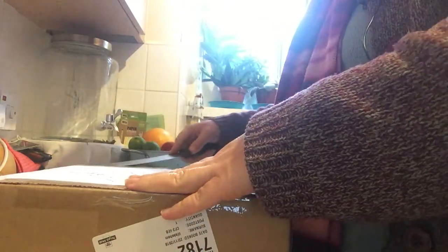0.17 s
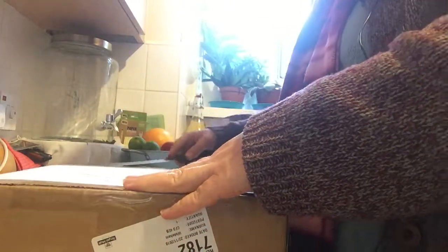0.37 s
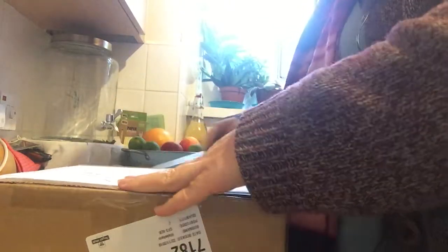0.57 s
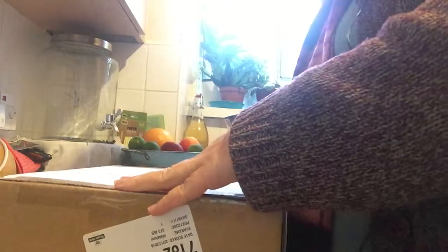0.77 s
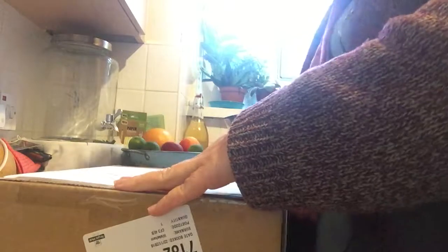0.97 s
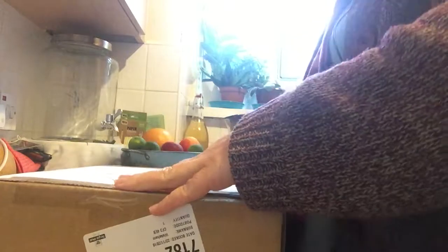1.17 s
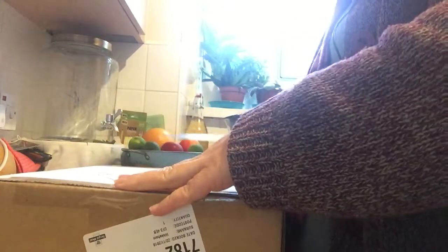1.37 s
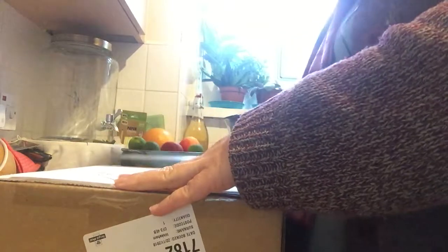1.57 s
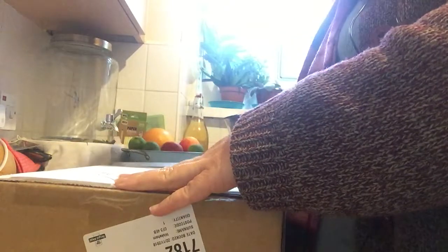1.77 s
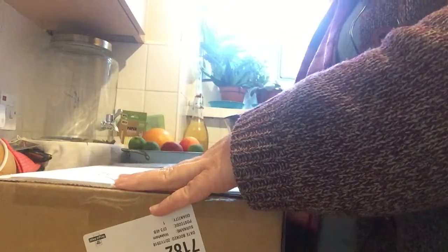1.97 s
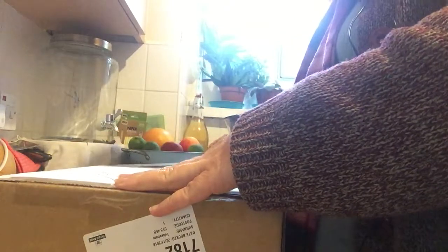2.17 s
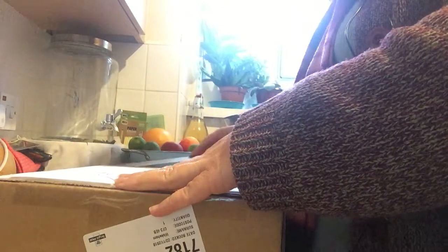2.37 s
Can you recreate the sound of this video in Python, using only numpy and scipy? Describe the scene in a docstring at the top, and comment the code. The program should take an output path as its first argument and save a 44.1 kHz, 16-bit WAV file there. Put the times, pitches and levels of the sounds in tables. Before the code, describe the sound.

A knife cuts packing tape on a cardboard box, close by in a small kitchen. It jabs in with a hollow knock at 0.1 seconds, then drags and catches from 0.4 to 0.6. From 0.8 to 1.1 it slits through with a rising zip and a thud. Quieter tape snaps and taps follow, with a knock at 1.9 and a light scrape from 2.2, over a low handling rumble.

```python
"""Knife opening a taped parcel

A knife works through the packing tape of a cardboard box, close by in a small kitchen. The blade
sticks and slips: each slip shakes the box and tears the tape in tiny clicks. After a jab and a long
pull, one stroke slits through with a rising zip and a thud. Then come tape snaps, knocks of the tip
and a light scrape, over a deep handling rumble and a faint hum."""
import sys
import numpy as np
from scipy import signal
from scipy.fft import rfft, irfft
from scipy.io import wavfile
from scipy.ndimage import uniform_filter1d

SR = 44100
rng = np.random.default_rng(int(sys.argv[2]) if len(sys.argv) > 2 else 0)


def store_pcm(level_fs):
    """Save levels as 16-bit WAV."""
    pcm = np.round(np.clip(level_fs, -1, 1) * 32767).astype(np.int16)
    wavfile.write(sys.argv[1], SR, np.atleast_2d(pcm).T)


N = 106236

# The tone of tearing tape. Each row: frequency in Hz, level in dB.
TAPE_TONE = [(900, -25.5), (1800, 2), (2800, 1), (3600, 2), (5500, 4.5), (8500, 2), (11000, 1.5),
             (13500, -3.5), (16000, -7.5)]
TEARS_PER_S, TEAR_SCATTER_DB = 5500, 0.5
PULL_TILT = -1.9  # a tilt is in dB per octave: higher is brighter


def stroke(levels, board_tone, tilt, blade_db=-24.5, fade_db_per_s=411):
    """The blade sticks and slips: it shakes the box, crushes fibres, tears tape and rings a little."""
    t = seconds()
    times, board_db, tape_db = np.array(levels).T
    outside_s = np.maximum(times[0] - t, 0) + np.maximum(t - times[-1], 0)
    grip = unit(undb(1.5 * wander(300))) * undb(-fade_db_per_s * outside_s)
    slips = unit(random_clicks(per_s=1300, scatter_db=2.5))
    force = grip * undb(np.interp(t, times, board_db) - 5)
    board = through(slips * force, energy_one(colour(box_ring(), board_tone)))
    crush = through(flutter(slips) * force, energy_one(colour(click(0), board_tone)))
    tears = unit(random_clicks(TEARS_PER_S, TEAR_SCATTER_DB)) + 0.064 * slips
    tears = unit(tears + undb(-2.5) * flutter(tears))
    # The steel blade's notes. Each row: frequency in Hz, level in dB, seconds to fade by 60 dB.
    blade_notes = [(1936, 9.5, 0.26), (2136, 7, 0.17), (2830, -2, 0.088), (3800, -1, 0.24),
                   (5850, -13, 0.12), (6660, -7, 0.13)]
    tape_and_blade = energy_one(colour(click(0), TAPE_TONE, tilt)) + undb(blade_db) * ring(blade_notes)
    rasp = through(tears * grip * undb(np.interp(t, times, tape_db) - 2.4), tape_and_blade)
    return board + undb(2.5) * crush + rasp


def box_ring(dense_db=1):
    """A tapped box rings with its panels' notes and the dense, quickly dying noise of corrugated card."""
    # Each row: frequency in Hz, level in dB, seconds to fade by 60 dB.
    panel_notes = [(133, 0, .09), (217, 0.5, .095), (255, -5, .06), (323, -3, .055), (365, -4, .07),
                   (492, 1, .05), (570, 1, .055), (680, -3, .045), (758, -4, .07), (894, -9, .07),
                   (1206, -2, .038), (1712, -19, .05), (2266, -18, .04)]
    return ring(panel_notes, spread=.006) + undb(dense_db) * tail(.03)


def cuts():
    """A jab, a long pull and a slit, with the blade buried in the tape so that it barely rings."""
    # Each row: time in seconds, relative cardboard level in dB, relative tape level in dB.
    jab = [(0, -32.5, -57), (.032, -66, -69), (.07, -48, -53), (.09, -41, -55.5), (.111, -36.5, -51.5),
           (.116, -23, -39), (.127, -25.5, -28), (.138, -68, -51), (.146, -29.5, -40), (.166, -32.5, -40),
           (.21, -61, -66), (.236, -37.5, -56), (.26, -53, -50.5), (.34, -47, -50.5), (.385, -57, -66)]
    pull = [(0.385, -51, -61), (0.411, -36.5, -44), (0.503, -31.5, -37.5), (0.563, -40, -45),
            (0.575, -34.5, -33), (0.605, -48.5, -52.5), (0.631, -49, -50.5), (0.743, -48.5, -49.5),
            (0.75, -45, -57)]
    slit = [(0.75, -53, -50.5), (0.778, -43, -51.5), (0.79, -30, -44), (0.802, -34, -34),
            (0.812, -36.5, -50.5), (0.83, -41.5, -44.5), (0.87, -30.5, -47), (0.884, -38.5, -50.5),
            (0.914, -31.5, -35), (0.946, -30.5, -33), (0.984, -33, -34), (1.014, -41, -47),
            (1.036, -44, -51.5), (1.098, -42, -50), (1.17, -45, -47), (1.265, -53.5, -62.5)]
    # The cardboard's tone under each stroke. Each row: frequency in Hz, level in dB.
    jab_tone = [(60, -57), (125, 0.5), (230, -4), (300, 0.5), (470, 1.5), (600, 0), (880, -4.5),
                (1050, -10.5), (1400, -16.5), (2500, -17), (4000, -29)]
    pull_tone = [(60, -29.5), (125, -1.5), (350, 4.5), (520, -3), (800, 1.5), (1050, -5), (1500, -12.5),
                 (2200, -9.5), (4000, -35)]
    slit_tone = [(60, -13.5), (135, 3), (230, 0.5), (480, 0), (750, -0.5), (1100, -5.5), (1600, -10),
                 (2400, -16), (4000, -56)]
    return (stroke(jab, jab_tone, tilt=-1.4)
            + stroke(pull, pull_tone, tilt=PULL_TILT)
            + stroke(slit, slit_tone, tilt=-0.76))


def light_scrape():
    """The blade skims the tape, then eases off and settles, ringing more freely than in a cut."""
    # Each row: time in seconds, relative cardboard level in dB, relative tape level in dB.
    skim = [(2.165, -55, -57), (2.253, -48.5, -49.5), (2.29, -55.5, -56)]
    settle = [(2.305, -57, -61), (2.34, -44.5, -55.5), (2.385, -67, -56), (2.409, -40.5, -55)]
    # The cardboard's tone. Each row: frequency in Hz, level in dB.
    tone = [(60, -9), (130, 3.5), (205, 6), (330, -0.5), (520, 0), (780, -1), (1100, -8.5), (2000, -11.5),
            (4000, -31)]
    return (stroke(skim, tone, tilt=0.9, blade_db=-8, fade_db_per_s=116)
            + stroke(settle, tone, tilt=-9, blade_db=-8))


def catches(start_s=.405, end_s=.58, per_s=95):
    """The blade keeps catching in the long pull; each release nicks the tape and rings lid and blade."""
    # Each row: frequency in Hz, level in dB, seconds to fade by 60 dB.
    notes = [(735, 1, 0.088), (895, -0.5, 0.051), (1120, -2, 0.019), (1680, -20, 0.027), (1955, -9, 0.049),
             (2420, -7, 0.013)]
    gaps, sizes = rng.standard_normal((64, 2)).T
    times = start_s + np.cumsum(np.exp(.25 * gaps)) / per_s
    releases = sum(undb(-11.5 + 2 * size) * click(at) for at, size in zip(times, sizes) if at < end_s)
    tick = energy_one(colour(tail(0.0048), TAPE_TONE, PULL_TILT))
    return through(releases, ring(notes, spread=.006) + undb(-11) * tick)


def slit_through(zip_s=.943, width_s=.02, zip_db=-36.5, band_hz=2200, thud_s=.9545):
    """The tape parts with a zip that climbs as the blade speeds up, and the lid gives way with a thud."""
    # Each row: time in seconds, pitch of the zip in Hz.
    zip_pitch = [(.912, 3400), (.926, 3957), (.936, 5250), (.955, 5750), (.98, 5500)]
    t = seconds()
    hz = np.interp(t, *np.array(zip_pitch).T)
    overtone = swell(zip_s + .018, width_s, zip_db - 4.5) * narrow_noise(2 * hz, 2 * band_hz)
    main_note = swell(zip_s, width_s, zip_db) * narrow_noise(hz, band_hz)
    roughness = unit(undb(2.5 * wander(460)))
    push = np.exp(-2 * np.pi * 400 * t) - np.exp(-t / 0.066)  # builds fast, lets go slowly
    return (main_note + overtone) * roughness + undb(-21) * through(click(thud_s), push)


def knocks(boost_db=12):
    """The knife tip knocks on the hollow box and rings its panels."""
    # Each row: start in seconds, level in dB before the boost, tilt in dB per octave.
    hits = [(0.1218, -9, 2.5), (.131, -11, -1), (.234, -46, 3), (0.5701, -15, 2), (0.791, -28, -2),
            (0.947, -23, 12), (1.2913, -41.5, -1.5), (1.8972, -22, 2), (1.9015, -41, 4.5),
            (1.978, -36.5, 3), (2.3233, -21, 1)]
    # Each row: frequency in Hz, level in dB.
    tone = [(50, -28.5), (120, -1.5), (330, -1), (490, 3.5), (750, -3.5), (1000, -7), (1220, -2),
            (1450, -10.5), (2500, -16), (7000, -42), (16000, -46)]
    panels = box_ring(dense_db=-9)
    return sum(undb(db + boost_db) * delayed(energy_one(colour(panels, tone, tilt)), at)
               for at, db, tilt in hits)


def bumps(boost_db=11):
    """The parcel shifts on the worktop, and dull bumps ring the low notes of its panels."""
    # Each row: start in seconds, level in dB before the boost.
    hits = [(.7745, -19), (.9135, -17), (.9555, -16), (1.005, -20), (1.2915, -28), (1.668, -39),
            (1.982, -33)]
    # Each row: frequency in Hz, level in dB.
    tone = [(40, 16.5), (120, 1.5), (300, 9), (700, -5.5), (1300, -5), (3000, -17), (16000, -46)]
    pushes = sum(undb(db + boost_db) * click(at) for at, db in hits)
    return through(pushes, energy_one(colour(box_ring(), tone)))


def snaps():
    """Tight tape lets go with a sharp tick and a short noisy tail."""
    # Each row: start in seconds, relative level in dB, tilt in dB per octave.
    releases = [(0.1134, -22.5, 1), (0.5763, -18.5, 10), (0.7888, -23, 4), (.793, -26, 14), (.8253, -33, 1),
                (1.2778, -29.5, -3.5), (1.4791, -31.5, -4), (1.825, -48, 1), (2.087, -33.5, 11.5),
                (2.126, -32, 5.5), (2.1564, -31.5, 9), (2.3233, -21, -6.5)]
    # Each row: frequency in Hz, level in dB.
    tone = [(300, -39), (2000, -19), (3500, -5), (5800, 3.5), (8500, -7.5), (12000, -5), (16000, -18.5)]
    crack = click(0) + 1.2 * tail(0.009) + undb(-2.5) * tail(0.11)
    return sum(undb(db) * delayed(2 * energy_one(colour(crack, tone, tilt)), at)
               for at, db, tilt in releases)


def scratches(fall_s=0.0085):
    """The tip snags and tears the tape in brief bursts."""
    # Each row: peak time in seconds, rise in seconds, relative level in dB, tilt in dB per octave.
    bursts = [(0.122, 0.0028, -32.5, 2), (0.144, 0.0014, -33.5, -4), (.801, 0.0034, -37.5, 17),
              (1.8915, 0.0039, -50, 4), (1.902, 0.0086, -51, -5), (1.975, 0.0025, -46, 0.5),
              (2.3196, 0.0035, -39, -3)]
    t = seconds()
    tears = random_clicks(TEARS_PER_S, TEAR_SCATTER_DB)
    tears = unit(tears) + flutter(tears)
    sound = np.zeros(N)
    for at, rise_s, db, tilt in bursts:
        loudness = undb(db) * np.exp(np.minimum((t - at) / rise_s, (at - t) / fall_s))
        sound += loudness * unit(colour(tears, TAPE_TONE, tilt))
    return sound


def slides():
    """The flat of the blade rubs along the tape's edge, and the friction makes rough notes."""
    # Each row: peak time in seconds, width in seconds, level in dB, pitch in Hz, pitch spread in Hz.
    rubs = [(1.18, 0.064, -57.5, 1895, 330), (1.35, 0.11, -72, 1945, 100), (2.2, 0.058, -56, 757.6, 220),
            (2.22, 0.045, -64, 2810, 260), (2.23, 0.029, -59.5, 6100, 950),
            (2.308, 0.024, -53.5, 1958, 100)]
    return sum(swell(at, width_s, db) * narrow_noise(hz, band_hz) for at, width_s, db, hz, band_hz in rubs)


def brushes():
    """The hand that steadies the box brushes softly over the lid."""
    # Each row: peak time in seconds, width in seconds, level in dB.
    touches = [(1.384, 0.076, -61), (1.672, 0.005, -67)]
    # Each row: frequency in Hz, level in dB.
    tone = [(80, -16), (300, 0), (700, 1.5), (1200, -12), (2400, -17.5), (16000, -46)]
    return sum(swell(*touch) for touch in touches) * unit(colour(rng.standard_normal(N), tone))


def rumble():
    """Handling makes a very deep rumble that eases once the cut is done."""
    # Each row: time in seconds, level in dB.
    levels = [(0, -29.5), (.5, -27), (1.05, -26.5), (1.3, -36.5), (1.6, -35), (1.8, -57), (2.1, -45),
              (2.409, -52)]
    sway = filtered(rng.standard_normal(2 * N), [2.732, 4.236], "band")[N:]  # skip the slow build-up
    upper = filtered(rng.standard_normal(N), 27.2, "low")
    loudness = undb(np.interp(seconds(), *np.array(levels).T))
    return (unit(sway) + undb(-19.5) * unit(upper)) * loudness


def kitchen(split_hz=2000):
    """The direct sound, then a short echo off the tiles in which the treble dies a little sooner."""
    low = filtered(tail(0.32), split_hz, "low")
    high = filtered(tail(0.3), split_hz, "high")
    return click(0) + undb(-12) * through(low + 0.85 * high, click(.005))


def background(hum_hz=323):
    """Faint room noise and the hum of an appliance, both wavering slightly."""
    # Each row: frequency in Hz, level in dB.
    air_tone = [(20, 7), (45, -1), (90, -11.5), (200, -15.5), (500, -24.5), (1000, -32.5), (2500, -43),
                (8000, -44.5), (16000, -49)]
    air = unit(colour(rng.standard_normal(N), air_tone)) * undb(wander(6.1))
    hum = unit(np.sin(2 * np.pi * hum_hz * seconds()) * undb(2 * wander(11.3)))
    return undb(-52) * air + undb(-67) * hum


def undb(db):
    """Turn decibels into a multiplier."""
    return 10 ** (np.asarray(db) / 20)


def unit(x):
    """Scale to an average power of 1."""
    return x / np.sqrt(np.mean(x ** 2))


def energy_one(x):
    """Scale to a total energy of 1."""
    return x / np.sqrt(np.sum(x ** 2))


def seconds():
    """The time of every sample."""
    return np.arange(N) / SR


def through(x, response):
    """Play x through something whose answer to one click is the given response."""
    return signal.fftconvolve(x, response)[:N]


def filtered(x, hz, kind):
    """Keep the lows, the highs or a band of x."""
    return signal.sosfilt(signal.butter(2, hz, kind, fs=SR, output="sos"), x)


def colour(x, tone, tilt=0):
    """Shape the bass and treble of x with a tone table and a tilt."""
    size = 8192
    hz, db = np.array(tone, float).T
    octave = np.log2(np.maximum(np.arange(size // 2 + 1) * SR / size, 1))
    gain_db = np.interp(octave, np.log2(hz), db + tilt * np.log2(hz / hz.mean()))
    # Fold the filter so that nothing sounds before the click that causes it.
    cepstrum = irfft(np.log(undb(gain_db)))
    cepstrum[1:size // 2] *= 2
    cepstrum[size // 2 + 1:] = 0
    return through(x, irfft(np.exp(rfft(cepstrum))))


def decay(fade_s):
    """A level that falls 60 dB in fade_s seconds."""
    return np.exp(-np.log(1000) * seconds() / fade_s)


def tail(fade_s):
    """Noise that dies away."""
    return energy_one(rng.standard_normal(N) * decay(fade_s))


def click(at):
    """A one-sample click at a time in seconds."""
    return signal.unit_impulse(N, int(np.clip(at * SR, 0, N - 1)))


def delayed(x, at):
    """Start x at a time in seconds."""
    return np.concatenate([np.zeros(int(max(at, 0) * SR)), x])[:N]


def ring(notes, spread=0):
    """Fading notes sound together; spread puts each a little out of tune at random."""
    detunes = 1 + spread * rng.standard_normal(len(notes))
    return energy_one(sum(undb(db) * decay(fade_s) * np.sin(2 * np.pi * hz * detune * seconds())
                          for (hz, db, fade_s), detune in zip(notes, detunes)))


def random_clicks(per_s, scatter_db):
    """Clicks at random times, mostly small and a few larger."""
    size = undb(scatter_db * np.minimum(rng.exponential(size=N), 5))
    return (rng.random(N) < per_s / SR) * size * rng.choice([-1, 1], N)


def flutter(clicks):
    """A tiny burst of noise after each click."""
    power = through(clicks ** 2, np.exp(-seconds() / 0.0035))
    return unit(np.sqrt(np.abs(power)) * rng.standard_normal(N))


def wander(per_s):
    """A smooth random drift, about 1 in size."""
    count = int(SR / per_s)
    return unit(uniform_filter1d(uniform_filter1d(rng.standard_normal(N), count), count))


def narrow_noise(hz, band_hz):
    """Noise around a pitch that may move."""
    phase = 2 * np.pi * np.cumsum(hz * np.ones(N)) / SR
    return unit(wander(band_hz) * np.sin(phase) + wander(band_hz) * np.cos(phase))


def swell(at, width_s, db):
    """A level that rises and falls in a bell shape."""
    return undb(db) * np.exp(-.5 * ((seconds() - at) / width_s) ** 2)


def scene():
    """Knife and parcel sound in the kitchen, over the rumble and the background, in one channel."""
    cutting = cuts() + light_scrape() + catches() + slit_through()
    parcel = cutting + knocks() + bumps() + snaps() + scratches() + slides() + brushes()
    return (through(parcel, kitchen()) + rumble() + background())[None]


def record(dry):
    """Cut away the highest treble."""
    top_hz = 16000
    return signal.sosfilt(signal.ellip(10, .2, 70, top_hz, fs=SR, output="sos"), dry)


dry = scene()
out = record(dry)
store_pcm(out)
```